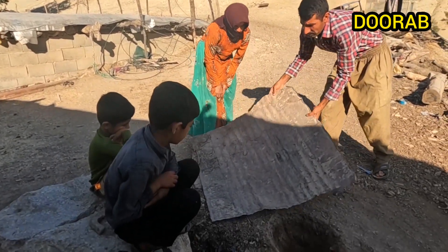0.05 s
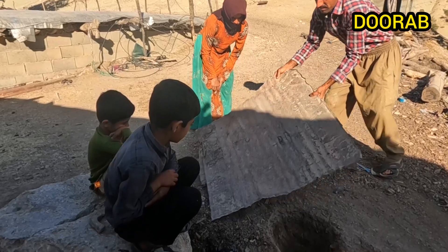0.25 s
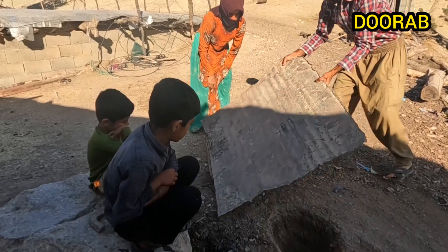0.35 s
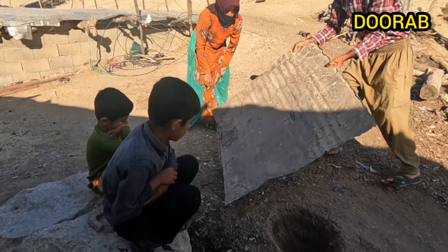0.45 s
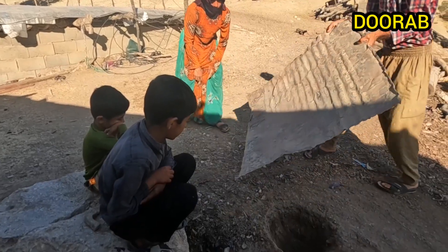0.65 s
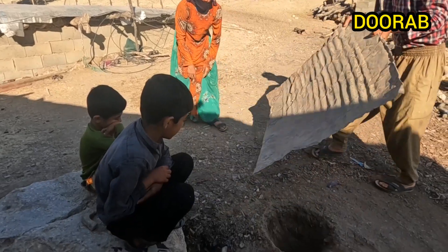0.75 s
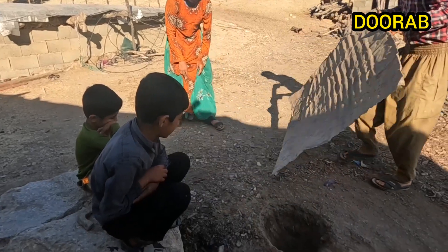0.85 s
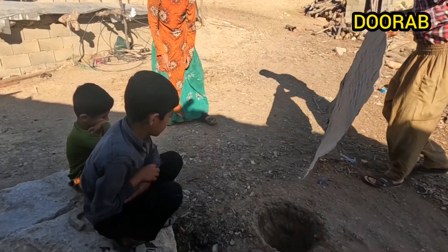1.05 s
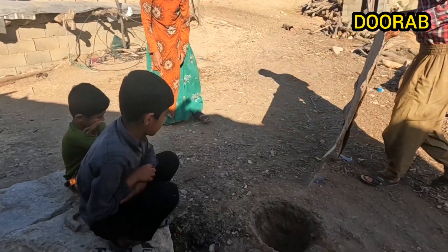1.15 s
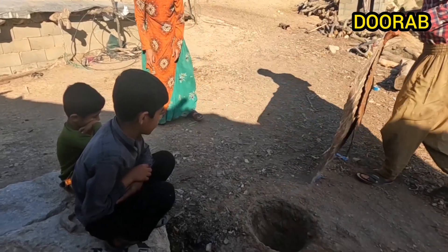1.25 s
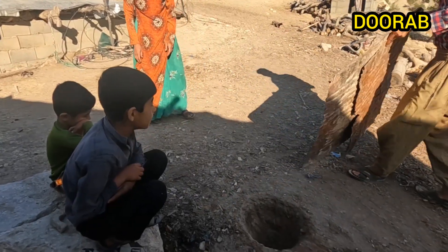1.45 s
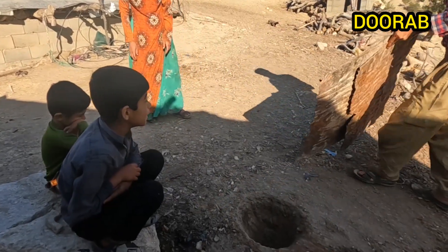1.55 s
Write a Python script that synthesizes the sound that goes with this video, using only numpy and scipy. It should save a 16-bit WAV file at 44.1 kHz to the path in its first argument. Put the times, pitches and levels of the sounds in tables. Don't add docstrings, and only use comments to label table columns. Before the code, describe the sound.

Gritty scraping of a ribbed steel sheet on stony earth builds to a hard, short metallic clank, then sparse scuffs and pebble ticks fade before a faint final contact; open yard, slight wall echo, faint wind on the microphone.

```python
import sys
import numpy as np
from scipy import signal
from scipy.fft import rfft, irfft, next_fast_len
from scipy.io import wavfile
from scipy.ndimage import map_coordinates

SR = 44100
rng = np.random.default_rng(int(sys.argv[2]) if len(sys.argv) > 2 else 0)


def gain_from_decibels(decibels):
    exponent = np.asarray(decibels, float) / 20
    return 10 ** exponent


def output_pcm(signal):
    pcm = np.clip(np.atleast_2d(signal).T, -1, 1) * 32767
    wavfile.write(sys.argv[1], SR, np.round(pcm).astype(np.int16))


N = 70560


def unit(x):
    return x / np.sqrt(np.mean(x ** 2) + 1e-20)


def along(points, hz):
    f, v = np.transpose(points)
    return np.interp(np.log(hz + 1), np.log(f + 1), v)


def curves(rows):
    s, *cols = np.transpose(rows)
    return [np.interp(np.arange(N) / SR, s, c) for c in cols]


def wobble(knots_per_s):
    return map_coordinates(rng.standard_normal(200), [np.arange(N) * knots_per_s / SR])


def filtered(x, response):
    m = next_fast_len(x.shape[-1] + 8192)
    spectrum = rfft(x, m) * response(np.fft.rfftfreq(m, 1 / SR))
    return irfft(spectrum, m)[..., :x.shape[-1]]


def resonances(peaks):
    def response(f):
        return sum((-1) ** k * gain_from_decibels(db) * 1j * f * w / (c * c - f * f + 1j * f * w)
                   for k, (c, w, db) in enumerate(peaks))
    return response


def bell(hz, octaves):
    return lambda f: np.exp(-(np.log2(f / hz + 1e-9) / octaves) ** 2)


def grit(grains_per_s, spread_db, size):
    hit = rng.random(size) < grains_per_s / SR
    strength = rng.standard_normal(size)
    power = rng.exponential(size=size)
    return hit * strength * gain_from_decibels(spread_db * np.minimum(power, 3))


def dying(colour, t60s, channels):
    hz, t, z = signal.stft(rng.standard_normal((channels, SR // 2)), SR, nperseg=128)
    fall_db = colour(hz)[:, None] - 60 * t / along(t60s, hz)[:, None]
    return signal.istft(z * gain_from_decibels(fall_db), SR, nperseg=128)[1][:, :SR // 2]


def add(track, s, x):
    part = track[round(s * SR):][:len(x)]
    part += x[:len(part)]


def rush(spectrum, alike):
    def mid_side(hz):
        turn = np.arccos(np.clip(along(alike, hz), -1, 1)) / 2
        return gain_from_decibels(along(spectrum, hz)) * [np.cos(turn), np.sin(turn)]
    mid, side = filtered(rng.standard_normal((2, N)), mid_side)
    return unit(np.array([mid + side, mid - side]))


# (frequency [Hz], density [dB per Hz])
YARD_SPECTRUM = [(59, -21), (100, -14.5), (415, -27.5), (621, -47), (1080, -23), (2320, -36.5), (7290, -33),
                 (12400, -44.5), (16000, -76)]
# (frequency [Hz], left-right likeness [-1..1])
YARD_LIKENESS = [(100, 0.48), (1000, 0.16), (5000, 0.68), (12000, 0.12)]


def yard():
    t = np.arange(N) / SR
    level_db = -65.5 - 5.5 * (t - 1.4454) + wobble(9.93)
    return gain_from_decibels(level_db) * rush(YARD_SPECTRUM, YARD_LIKENESS)


# (time [s], level [dB])
GUST_LEVEL = [(0, -47.5), (.45, -50.5), (.75, -54.5), (1.2, -56), (1.6, -57)]
# (frequency [Hz], density [dB per Hz])
WIND_SPECTRUM = [(8, -0.5), (18, 14), (32, -9.5), (60, -3.5), (250, -54)]
# (time [s], level [dB], frequency [Hz])
EDDIES = [(.475, -49, 16), (0.531, -45, 44), (0.586, -40, 36), (.643, -41, 19.5), (0.898, -51.5, 26),
          (1.139, -45, 11)]


def wind():
    gust_db, = curves(GUST_LEVEL)
    t = np.arange(N) / SR
    rumble = unit(rush(WIND_SPECTRUM, [(30, .88)]) * gain_from_decibels(2.9 * wobble(13.54)))
    eddies = np.zeros(N)
    for s, db, hz in EDDIES:
        phase2 = (np.pi * hz * (t - s)) ** 2
        eddies += gain_from_decibels(db) * (1 - 2 * phase2) * np.exp(-phase2)
    return (rumble * gain_from_decibels(gust_db) + eddies) * gain_from_decibels([[-1.8], [1.8]])


# (centre [Hz], width [Hz], level [dB])
RIB_MODES = [(550, 200, -8.5), (733, 23, -2), (916, 79, 3.5), (1136, 57, 14.5), (1537, 37, 2),
             (2700, 70, -16)]
# (time [s], level [dB], centre [Hz], width [octaves], t60
# [s])
SAND_SCUFFS = [(.01, -54.5, 3370, 0.15, 0.27), (.02, -63, 6100, 0.14, 0.17),
               (0.121, -55, 6000, 0.54, 0.054), (.345, -52, 2180, 0.14, 0.11),
               (0.023, -48.5, 3250, 1.38, 0.094), (0.183, -46.5, 5600, 0.38, .1),
               (0.193, -35.5, 2700, 0.76, 0.099), (.197, -36, 1030, 0.61, 0.27),
               (0.246, -45, 7070, 0.59, 0.17), (0.251, -33, 944, 0.81, 0.18),
               (.342, -35, 944.4, 1.13, 0.22), (0.429, -38, 2850, 0.21, 0.22),
               (0.4533, -23.5, 967, .25, 0.04), (0.628, -59, 5500, 1.3, 0.34),
               (0.648, -48.5, 8700, 0.47, 0.051), (0.6728, -50, 4100, 0.83, 0.17),
               (0.673, -44.5, 1295, 0.66, 0.29), (0.709, -48.5, 1207, 0.36, 0.19),
               (0.71, -52, 567, 0.53, 0.091), (0.817, -45.5, 1290, 0.39, 0.042),
               (0.8, -60, 5400, 0.89, 0.41), (0.8523, -46.5, 5090, 1.1, 0.13),
               (0.86, -55, 1670, 0.13, 0.17), (.92, -42.5, 1350, 0.8, 0.19), (.921, -49.5, 330, 2.88, 0.36),
               (1.039, -68, 3700, 0.28, 0.25), (.921, -50.5, 2990, 0.11, 0.068),
               (0.734, -58.5, 2700, .3, 0.13), (0.809, -62, 2500, 0.85, 0.24), (.944, -56, 7900, .8, 0.042),
               (.999, -55, 7750, 0.68, 0.027), (1.335, -77.5, 12390, 0.089, 0.33),
               (1.394, -61.5, 6400, 0.78, 1.02), (.335, -53, 5500, .5, .2), (.58, -63, 11100, .5, 0.1),
               (.96, -58.5, 198, 0.46, 0.29), (1.123, -58, 3390, 2.3, 0.084), (1.41, -63, 2570, 0.91, 3.6)]


def scuffs():
    out, t = np.zeros(N), np.arange(SR // 2) / SR
    ribs = resonances(RIB_MODES)
    mottle_db, ribs_db = 3, -5.5
    for s, db, hz, octaves, t60 in SAND_SCUFFS:
        knots = rng.standard_normal(200)

        def colour(f):
            mottle = gain_from_decibels(mottle_db * map_coordinates(knots, [f / 120]))
            return bell(hz, octaves)(f) * mottle * (1 + gain_from_decibels(ribs_db) * ribs(f))
        sand = filtered(grit(5000, 1.5, len(t)), colour)
        rise_s = 0.00066 * gain_from_decibels(1.2 * max(-49 - db, 0))
        fall = gain_from_decibels(db - 60 * (t / t60) ** 1.255)
        add(out, s, unit(sand) * fall * (1 - np.exp(-t / rise_s)))
    return out


# (time [s], peak [dB], pitch [Hz], width
# [octaves], t60 [s])
STONES = [(.198, -29.5, 1580, 1.8, 0.013), (.257, -35, 1220, 1.2, 0.011), (0.4154, -18.5, 3740, 0.86, .025),
          (.4165, -18.5, 1240, 0.76, 0.0089), (0.4176, -28, 10100, 0.25, 0.027),
          (.427, -22.5, 1000, 1.04, .02), (0.7146, -31.5, 1320, 0.64, 0.01), (0.722, -41, 940, 0.65, 0.02),
          (0.771, -48, 2240, 0.67, 0.0043), (0.948, -48, 5700, .12, 0.019),
          (0.952, -51, 5760, 0.094, 0.011), (.982, -54, 2350, 0.28, .008), (.968, -48, 9660, 0.056, 0.0088),
          (1.0396, -38.5, 7300, 0.86, 0.01), (1.1042, -53.5, 5480, .6, 0.0063),
          (1.16, -49.5, 9000, .8, 0.0031), (1.186, -51, 8000, 1.15, 0.0071),
          (1.2344, -51.5, 9000, 0.74, 0.0049), (1.275, -59, 12100, 0.44, .004),
          (1.368, -63, 12000, 0.14, 0.0091), (1.4965, -47, 2000, 1, 0.01), (1.537, -45, 1610, 0.59, 0.0082),
          (0.9203, -34.5, 1680, 1.25, 0.026), (1.413, -52.5, 1190, 1.3, 0.0077),
          (1.4358, -40.5, 1383, 0.42, 0.039), (1.437, -37.5, 2800, 1.03, 0.0049),
          (1.4595, -39, 6760, 0.8, 0.014), (1.483, -46.5, 3550, 0.11, 0.013),
          (1.4987, -42, 7600, 0.48, 0.021), (1.502, -38, 1340, 1.53, 0.033), (1.515, -47, 2380, .7, 0.022),
          (1.523, -44, 1307, 0.56, 0.053), (1.55, -33.5, 2840, 1.46, 0.0034),
          (1.558, -36, 1120, 1.2, 0.0018)]


def pebbles():
    lead_s = .01
    out, t = np.zeros(N), np.arange(SR // 20) / SR - lead_s
    for s, db, hz, octaves, t60 in STONES:
        rattle = np.sin(2 * np.pi * hz * t) + 2 * rng.standard_normal(len(t))
        contact = 3.5 * (t < 1.5 / SR)
        snap = (rattle + contact) * gain_from_decibels(-60 * t / t60) * (t >= 0)
        snap = filtered(snap, bell(hz, octaves))
        add(out, s - lead_s, gain_from_decibels(db) * snap / np.abs(snap).max())
    return out


MODE_HZ = [931, 1035, 1104, 1400, 1515, 1646, 2447, 2638, 3040, 3382, 3512, 4542, 5036, 5225]
# (level [dB], t60 [s])
MODE_DECAY = [(-1, 0.29), (4.5, 0.2), (-4, 0.36), (2, 0.084), (-6.5, 0.088), (-2, 0.34), (-4.5, 0.14),
              (-23, 0.38), (-16.5, 0.31), (-11, 0.1), (-14, 0.11), (-11.5, 0.043), (-10.5, 0.11),
              (5, 0.059)]
# (frequency [Hz], density [dB per Hz])
CLOUD_SPECTRUM = [(350, -27.5), (780, -38.5), (950, -7.5), (1650, -6), (2050, -30.5), (3200, -16),
                  (5400, -13.5), (14000, -42)]
# (frequency [Hz], t60 [s])
CLOUD_DECAY = [(1200, 0.45), (3000, 0.19), (6000, 0.13), (9000, 0.08), (14000, 0.04)]
# (centre [Hz], width [Hz], level [dB])
CROWDED_MODES = [(1760, 37, 2), (2850, 340, 0.5), (3350, 180, 2.5), (3820, 57, -7), (5800, 130, 10),
                 (6160, 89, 5.5)]


def knock():
    knock_s, knock_db, rise_s = .4147, -21, 0.0011
    cloud_db, crack_db, crack_t60_s = -7.5, 4.5, 0.064
    rattle_db, rattle_per_s = 2.5, 55
    out, t = np.zeros(N), np.arange(SR // 2) / SR
    ring = np.zeros(len(t))
    for hz, (db, t60) in zip(MODE_HZ, MODE_DECAY):
        level_db = db - 60 * t / t60 + rattle_db * wobble(rattle_per_s)[:len(t)]
        ring += gain_from_decibels(level_db) * np.sin(2 * np.pi * hz * t) / 2
    cloud = dying(lambda hz: along(CLOUD_SPECTRUM, hz), CLOUD_DECAY, channels=1)[0]
    crowd = resonances
    cloud = filtered(cloud, lambda hz: 1 + np.abs(sum(crowd([peak])(hz) for peak in CROWDED_MODES)))
    crack = filtered(rng.standard_normal(len(t)), lambda hz: gain_from_decibels(along(CLOUD_SPECTRUM, hz)))
    crack = crack * gain_from_decibels(-60 * t / crack_t60_s)
    blow = ring + gain_from_decibels(cloud_db) * cloud / np.std(cloud[:800]) + gain_from_decibels(crack_db) * crack / np.std(crack[:100])
    add(out, knock_s, gain_from_decibels(knock_db) * blow * (1 - np.exp(-t / rise_s)))
    return out


def gravel(count):
    pitch_hz, spread_octaves, decay_cycles, spread_db = 1700, .6, 1.8, 1.6
    when, pitch, size = rng.random((3, count))
    octaves = spread_octaves * np.log(pitch / (1 - pitch)) / 2
    hz = np.clip(pitch_hz * 2 ** octaves, 300, 5000)[:, None]
    k = np.arange(400)
    grains = np.sin(2 * np.pi * hz * k / SR) * np.exp(-hz * k / SR / decay_cycles)
    grains = grains * gain_from_decibels(-spread_db * np.log(size + 0.01))[:, None]
    places = (when * N).astype(int)[:, None] + k
    return np.bincount(places.ravel(), grains.ravel(), N + len(k))[:N]


# (time [s], level [dB], panel flexing [dB])
DRAG_LEVEL = [(0, -48, -4.5), (.045, -45, -6.5), (.09, -49.5, -0.5), (.135, -47.5, 1), (.165, -52.5, -7.5),
              (.2, -45, -7.5), (.26, -40.5, -1.5), (.32, -43, 1.5), (.35, -42, 2.5), (.44, -39.5, -6),
              (.5, -52, -3.5), (.57, -60, 0.5), (.8, -66.5, 1), (1.15, -77, 2.5), (1.385, -80.5, 0.5),
              (1.415, -55.5, -6), (1.47, -62.5, -10), (1.6, -59.5, -7.5)]
# (frequency [Hz], density [dB per Hz])
SHEET_SPECTRUM = [(180, -29), (300, -2), (692, 0.5), (775, -8.5), (940, -4), (4540, -16), (7240, -21),
                  (11700, -29), (14000, -36.5)]
# (centre [Hz], width [Hz], level [dB])
PANEL_MODES = [(158.2, 38.6, -1.5), (251, 44.8, -3), (330, 81, -8)]


def drag():
    level_db, panel_db = curves(DRAG_LEVEL)
    ribs, flexing = resonances(RIB_MODES), resonances(PANEL_MODES)
    push = unit(grit(900, -5.5, N)) * gain_from_decibels(0.95 * wobble(45)) + 1.1 * rng.standard_normal(N)
    body = unit(filtered(push, lambda hz: gain_from_decibels(along(SHEET_SPECTRUM, hz)) * (.5 + gain_from_decibels(-3.5) * ribs(hz))))
    shove = rng.standard_normal(N) * gain_from_decibels(wobble(21.2))
    panel = unit(filtered(shove, lambda hz: flexing(hz) ** 2))
    crunch = gain_from_decibels(-8 - panel_db) * gravel(count=4000)
    return gain_from_decibels(level_db) * (body + gain_from_decibels(panel_db) * panel + crunch)


# (frequency [Hz], t60 [s])
WALL_DECAY = [(200, 0.057), (2000, 0.18), (10000, 0.093)]


def wall(near):
    tail = dying(lambda hz: 10 * np.log10(hz / (hz + 1000) + 1e-3), WALL_DECAY, channels=2)
    late = np.pad(near, (500, 0))[None]
    return signal.fftconvolve(late, tail / np.linalg.norm(tail[0]), axes=1)[:, :N]


# (frequency [Hz], left lead [rad])
LEFT_LEAD = [(550, -0.2), (1300, -0.77), (2150, -0.74), (3700, -0.91), (4900, -0.7), (7200, -0.79),
             (8500, -0.19), (14000, -1.5)]
# (frequency [Hz], left over right [dB])
LEFT_LEAN = [(100, -2), (700, -0.5), (1300, -2), (4400, -1), (8000, -0.5), (15000, 9)]
# (time [s], left over right [dB])
SHEET_PAN = [(0, 1.5), (.5, 1), (1, -1.5), (1.6, -1)]


def scene():
    near = drag() + knock() + scuffs() + pebbles()
    sides = np.array([[.5], [-.5]])
    direct = filtered(near, lambda hz: gain_from_decibels(sides * along(LEFT_LEAN, hz))
                      * np.exp(1j * sides * along(LEFT_LEAD, hz)))
    return direct * gain_from_decibels(sides * curves(SHEET_PAN)[0]) + gain_from_decibels(-11.5) * wall(near) + wind() + yard()


def band_limit(x):
    return signal.sosfilt(signal.butter(12, 16500, fs=SR, output="sos"), x)


# (frequency [Hz], gain [dB])
MIC_RESPONSE = [(700, 1.5), (1250, -0.5), (2050, -0.5), (2900, 2.5), (7000, -1.5), (9200, -7),
                (12300, -0.5), (15800, -17)]


def record(dry):
    heard = filtered(dry, lambda hz: gain_from_decibels(along(MIC_RESPONSE, hz)) * (hz < 16300))
    return band_limit(heard)


dry = scene()
out = record(dry)
output_pcm(out)
```